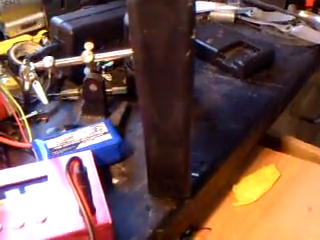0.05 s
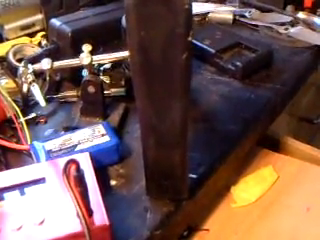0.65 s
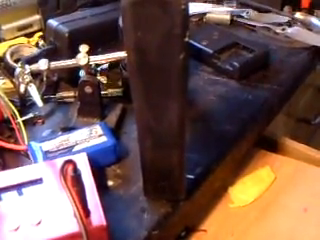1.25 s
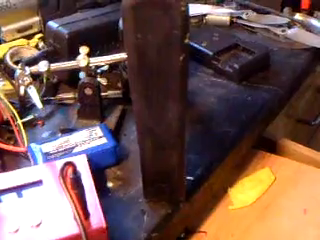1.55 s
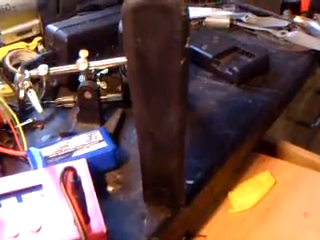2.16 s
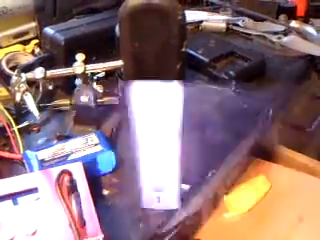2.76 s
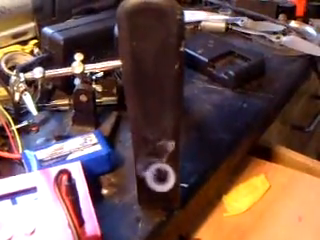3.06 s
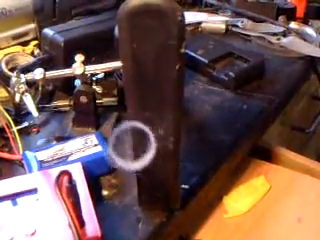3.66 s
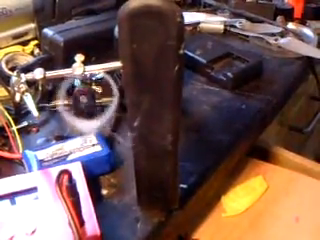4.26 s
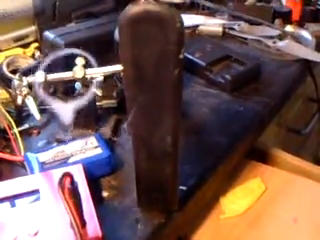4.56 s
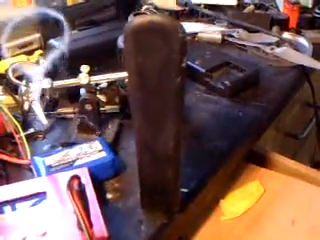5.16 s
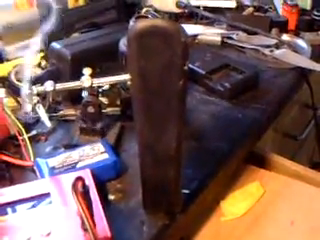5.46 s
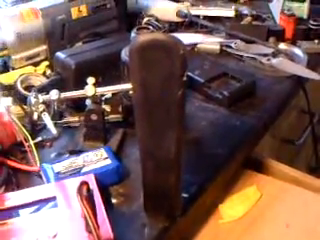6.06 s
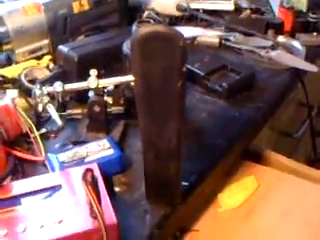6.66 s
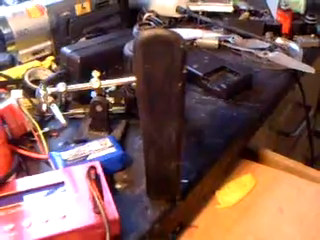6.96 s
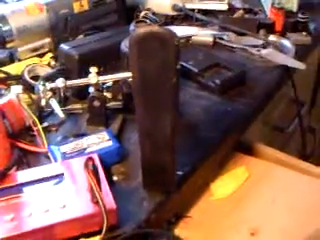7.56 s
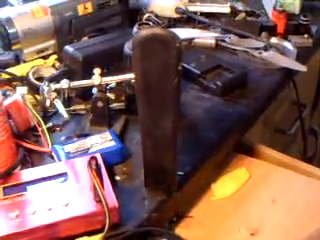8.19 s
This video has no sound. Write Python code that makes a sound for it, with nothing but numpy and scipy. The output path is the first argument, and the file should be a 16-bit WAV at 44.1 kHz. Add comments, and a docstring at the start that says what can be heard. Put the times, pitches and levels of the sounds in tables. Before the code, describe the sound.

A homemade device fires once on a workbench with a sharp crack and pop, over a faint fan whine, followed by camera handling ticks.

```python
"""A small fan whines throughout, over room rumble and microphone hiss. Three seconds in, a homemade
device fires once on a cluttered workbench: a bright ignition crack, then a pop of gas that sets the
bench top and the small room ringing briefly. A dry, switch-like click follows, two faint ticks around
it. The bench takes a soft knock, then fingers tick on the camera's housing. From about six seconds the
hand turns the camera: the fan grows a little louder, and the fingers tick harder and rub the shell."""
import sys
import numpy as np
from scipy import signal
from scipy.fft import rfft, irfft, next_fast_len
from scipy.io import wavfile
from scipy.ndimage import map_coordinates

SR = 44100
rng = np.random.default_rng(int(sys.argv[2]) if len(sys.argv) > 2 else 0)


def dump_mix(stems):
    """Bounce the given channels to the path in sys.argv[1] as a 16-bit WAV at rate SR."""
    frames = np.atleast_2d(stems).T  # one column per channel
    limited = np.clip(frames, -1, 1)  # hard clip at full scale
    pcm = np.round(limited * 32767).astype(np.int16)
    wavfile.write(sys.argv[1], SR, pcm)


N = 367353

# The ring of the bench top and its clutter. Each row: pitch in Hz, relative level in dB, t60 in seconds.
BENCH_MODES = [(140, -7, 0.29), (234.3, 0.5, 0.24), (294, -7, 0.24), (331, 0.5, 0.2), (387, -9, 0.34),
               (532, -11, .15), (610, -14, .16), (693, -3, 0.19), (693, -9, 0.27), (780, -11, .35),
               (895, -2, 0.19), (1140, -10, 0.16), (1230, -1, 0.14), (1324, -8, .18)]


def amp(db):
    """Decibels to gain."""
    return 10 ** (np.asarray(db) / 20)


def unit(x):
    """x at rms 1."""
    return x / np.sqrt(np.mean(x ** 2) + 1e-20)


def along(points, hz):
    """A curve through (Hz, value) points, joined on a log frequency axis."""
    f, v = np.transpose(points)
    return np.interp(np.log(hz + 1), np.log(f + 1), v)


def clock():
    """The time of each sample in seconds."""
    return np.arange(N) / SR


def wobble(rate):
    """A smooth random curve, rate knots a second."""
    return map_coordinates(rng.standard_normal(int(N * rate / SR) + 4), [clock() * rate])


def filtered(x, response):
    """x shaped by a gain that is a function of Hz."""
    size = 2 * next_fast_len((N + SR) // 2)
    return irfft(rfft(x, size) * response(np.fft.rfftfreq(size, 1 / SR)), size)[:N]


def coloured(x, spectrum, size=4096):
    """x through a minimum-phase EQ of (Hz, dB) points, so nothing rings ahead of a hit."""
    cepstrum = irfft(np.log(amp(along(spectrum, np.fft.rfftfreq(size, 1 / SR)))))
    fold = np.r_[1, np.full(size // 2 - 1, 2), np.zeros(size // 2)]
    return signal.fftconvolve(x, irfft(np.exp(rfft(cepstrum * fold))))[:N]


def fade(t, t60):
    """Exponential decay, 60 dB in t60."""
    return np.exp(-np.log(1000) * t / t60)


def at(s, x):
    """A short sound placed at s seconds."""
    return np.pad(x, (round(s * SR), N))[:N]


def impulse(s):
    """One sharp push at s seconds."""
    return at(s, np.ones(1))


def turn(middle_s=6.5, ease_s=.3):
    """How far the camera has turned, easing from 0 to 1."""
    return .5 + .5 * np.tanh((clock() - middle_s) / (2 * ease_s))


def room_air(level_db=-52.0):
    """A steady bed of room rumble and microphone hiss."""
    # The bed's colour. Each row: frequency in Hz, relative level in dB.
    air_eq = [(8.8, -40), (15, -1), (48, -2), (71, -12), (255, -13.5), (293, -14), (319, -14.5),
              (410, -17.5), (755, -18.5), (892, -23.5), (969, -20.5), (1350, -26.5), (11500, -35),
              (15000, -24.5), (22000, -120)]
    return amp(level_db) * unit(filtered(rng.standard_normal(N), lambda hz: amp(along(air_eq, hz))))


def fan(drift_hz=0.79, waver_db=1.7, whirr_hz=2800, width_hz=650, whirr_db=-73.5, swell_db=2.6):
    """Slightly unsteady tones and a band of whirr, swelling as the camera turns."""
    # The fan's tones and the room's hum. Each row: pitch in Hz, rms level in dB before the swell.
    tones = [(43.1, -61.5), (323, -69.5), (943, -65.5), (2829, -81.5), (6858, -94)]
    band = lambda hz: 1 / (1 + (2 * (hz - whirr_hz) / width_hz) ** 2)
    whirr = amp(whirr_db) * unit(filtered(rng.standard_normal(N), band))
    whine = np.zeros(N)
    for hz, db in tones:
        level = np.sqrt(2) * amp(db + waver_db * wobble(5))
        phase = 2 * np.pi * np.cumsum(hz + drift_hz * wobble(6)) / SR
        whine += level * np.sin(phase)
    return amp(swell_db * turn()) * (whirr + whine)


def burst(length_s):
    """A spit of noise that starts at once and collapses after length_s."""
    t = np.arange(SR // 20) / SR
    return rng.standard_normal(len(t)) * np.exp(-(t / length_s) ** 4)


def ringing(modes, attack_s):
    """Struck modes that bloom over attack_s, then die away each at its own rate."""
    t = np.arange(SR // 2) / SR
    ring = sum(amp(db) * fade(t, t60) * np.sin(2 * np.pi * hz * t) for hz, db, t60 in modes)
    return ring * (1 - np.exp(-t / attack_s))


def reverb(x, clutter_db, clutter_t60, room_db):
    """Quick scatter off the bench clutter, then the walls' longer tail."""
    # The small room's decay. Each row: frequency in Hz, t60 in seconds.
    wall_decay = [(120, 0.52), (400, 0.2), (1000, 0.31), (3000, 0.26), (8000, 0.27), (13000, 0.36)]
    hz, frame_s, noise = signal.stft(rng.standard_normal(SR), SR, nperseg=256)
    tail = noise * fade(frame_s, along(wall_decay, hz)[:, None])
    t = np.arange(SR) / SR
    walls = signal.istft(tail, SR, nperseg=256)[1][:SR] * np.clip(t / 0.013, 0, 1)
    clutter = rng.standard_normal(SR) * fade(t, clutter_t60) * (t > .004)
    response = amp(clutter_db) * unit(clutter) + amp(room_db) * unit(walls)
    return signal.fftconvolve(x, response)[:N] / np.sqrt(SR)


def shot(start_s=3.0409, pop_lag_s=0.001104, crack_gain_db=-14.5, pop_gain_db=24.3, send_db=19.0):
    """A crack of ignition, then one push of expanding gas; the device and the bench ring."""
    # The colours of the bright crack and the round pop. Each row: frequency in Hz, gain in dB.
    crack_eq = [(200, -24), (1500, -10), (3000, -4.5), (5000, 3.5), (6000, -7.5), (7100, 4), (8200, -3),
                (10500, -4), (13000, -11)]
    pop_eq = [(40, -43), (120, -19), (250, -2), (450, -0.5), (850, 2.5), (1050, -1.5), (1350, -11.5),
              (1700, -24), (2400, -17.5), (5000, -32), (12000, -41)]
    # Slaps off nearby objects. Each row: delay in seconds, gain in dB.
    reflections = [(.0031, -11.5), (.0064, -37), (.008, -18), (0.0102, -15), (0.018, -27)]
    # The ring of the device's hard parts. Each row: pitch in Hz, relative level in dB, t60 in seconds.
    part_modes = [(1970, 4.5, 0.13), (2370, 3, 0.11), (2870, 4, .11), (3610, 1, .12), (3855, 7, 0.1),
                  (4360, -16, 0.11), (5150, -3, .1), (7100, -1, .11), (7100, 27, .011), (8500, 21, .01)]
    pop_s = start_s + pop_lag_s
    crack = amp(crack_gain_db) * coloured(at(start_s, burst(0.0034)), crack_eq)
    pop = -amp(pop_gain_db) * coloured(impulse(pop_s), pop_eq)
    echoes = sum(amp(db) * at(delay, pop + .5 * crack) for delay, db in reflections)
    bench = amp(-33) * at(pop_s, ringing(BENCH_MODES, attack_s=0.0055))
    parts = amp(-41) * at(start_s, ringing(part_modes, attack_s=.0005))
    # Low sound spreads all round the room; the crack is beamed and stays drier.
    spread_eq = [(70, 1.5), (120, 14.5), (190, -4), (330, 0.5), (450, -5), (1000, -9.5), (2500, 2.5)]
    boom = reverb(coloured(pop, spread_eq), clutter_db=-1.5, clutter_t60=0.12, room_db=-10.5)
    crack_send = amp(crack_gain_db + send_db) * coloured(impulse(pop_s), crack_eq)
    crack_tail = reverb(crack_send, clutter_db=-7.5, clutter_t60=.06, room_db=-12)
    return crack + pop + echoes + bench + parts + boom + crack_tail


def switch(send_db=18):
    """A small hard part snaps back, with no bass, and the room answers."""
    # A faint click, then the snap. Each row: start in seconds, gain in dB, length in seconds.
    snaps = [(3.184, -46, 0.0035), (3.213, -22, 0.0038)]
    # The click's thin colour. Each row: frequency in Hz, gain in dB.
    click_eq = [(150, -20), (600, -5.5), (1050, 0), (1600, -10.5), (2200, 0.5), (3000, -3.5), (4300, -2),
                (5200, -6.5), (8300, -3.5), (10000, -5), (12500, -16)]
    clicks = coloured(sum(amp(db) * at(s, burst(length)) for s, db, length in snaps), click_eq)
    send = coloured(sum(amp(db + send_db) * impulse(s) for s, db, _ in snaps), click_eq)
    return clicks + reverb(send, clutter_db=-3.5, clutter_t60=0.1, room_db=-5.5)


def contact(force, corner_hz=1200):
    """A softer contact spreads the force in time and loses its treble."""
    return signal.lfilter(*signal.butter(2, min(corner_hz, .45 * SR), fs=SR), force)


def housing(force, stiff_hz=480):
    """The camera's shell answers a force with its damped resonances; it is too stiff to pass bass."""
    # The shell's resonances. Each row: centre in Hz, width in Hz, gain in dB.
    shell_modes = [(720, 180, -6), (900, 127, 2.5), (1103, 80, 8.5), (1310, 126, -8), (1740, 220, -9),
                   (2460, 420, -7), (3040, 420, -7.5), (4950, 840, -13.5), (7800, 1200, -15.5),
                   (9000, 610, -6.5), (11100, 1000, -19)]
    force = signal.lfilter(*signal.butter(2, stiff_hz, "high", fs=SR), force)
    return filtered(force, lambda hz: sum(
        amp(db) * 1j * hz * width / (centre ** 2 - hz ** 2 + 1j * hz * width)
        for centre, width, db in shell_modes))


def ticks(gain_db=15, push_lag_s=0.00034, grit_db=-13, grit_s=.0017):
    """Each tick is a gritty click and then a soft push, coloured by the housing's resonances."""
    # Two faint ticks around the switch click, then finger ticks on the housing.
    # Each row: start in seconds, force of the push in dB, force of the click in dB.
    hits = [(3.2035, -48, -32), (3.302, -42, -37.5), (5.181, -40, -36.5), (5.318, -27, -31.5),
            (6.7016, -18, -19), (6.7046, -11.5, -27), (6.7101, -12.5, -22.5), (6.7345, -11, -34),
            (6.7955, -25, -19), (7.155, -11, -22), (7.17, -17, -18), (7.591, -40, -37), (7.854, -22.5, -36),
            (8.23, -36, -36)]
    force = np.zeros(N)
    for s, push_db, click_db in hits:
        grit = amp(grit_db) * burst(grit_s)
        blow = signal.unit_impulse(len(grit))
        corner_hz = 6800 * 2 ** ((click_db + 19.5) / 9.5)  # 9.5 dB harder is an octave brighter
        force += at(s, amp(click_db) * contact(blow + grit, corner_hz))
        force += at(s + push_lag_s, amp(push_db) * contact(blow))
    shell = amp(gain_db) * housing(force)
    return shell + reverb(shell, clutter_db=-15, clutter_t60=0.036, room_db=-19)


def knock(start_s=4.787, gain_db=-43, damping_t60=0.15):
    """A padded touch wakes mainly the bench's low modes and damps them."""
    ring = ringing(BENCH_MODES, attack_s=0.0031)
    damped = ring * fade(np.arange(len(ring)) / SR, damping_t60)
    return coloured(amp(gain_db) * at(start_s, damped), [(350, 3), (700, -10.5)])


def hand_sway(level_db=-52.5):
    """The moving hand's deep thudding fades in with the turn and stays."""
    # The thudding's colour. Each row: frequency in Hz, relative level in dB.
    thud_eq = [(10, -17), (22, 0), (60, -19), (200, -41), (1000, -120)]
    rumble = filtered(rng.standard_normal(N), lambda hz: amp(along(thud_eq, hz)))
    return amp(level_db) * turn() * unit(rumble)


def stroke(peak_s, rise_s, release_share=0.68):
    """A slide gathers speed up to peak_s, then dies in a share of its rise time."""
    t = clock() - peak_s
    return np.exp(np.minimum(t / rise_s, -t / (release_share * rise_s)))


def rub(grain_db=2.5, pressure_waver_db=1.5):
    """Fingers slide with uneven pressure and feed the housing with many tiny slips."""
    # Finger strokes. Each row: fastest moment in seconds, level in dB, rise time in seconds.
    strokes = [(6.84, -54, 0.033), (6.98, -56.5, 0.068), (7.19, -52.5, 0.037), (7.345, -42.5, 0.047),
               (8.0, -55.5, 0.046), (8.2, -55.5, 0.078)]
    friction_eq = [(400, -1), (900, 1.5), (1120, -2.5), (1400, -2),
                   (2200, -8.0), (5000, -5.5), (9300, -11.0), (12000, -14)]
    friction = coloured(rng.standard_normal(N) * amp(grain_db * wobble(300)), friction_eq)
    speed = sum(amp(db) * stroke(s, rise) for s, db, rise in strokes)
    speed *= amp(pressure_waver_db * wobble(40))
    return speed * unit(housing(friction)) + chatter(speed)


def chatter(speed, slips_per_s=210, jitter=.2, gain_db=-3.5, fast_stroke_db=-42.5):
    """A fast finger sticks and slips; the soft slips grow with the square of its speed."""
    rate = slips_per_s * np.exp(jitter * wobble(150))
    count = np.floor(np.cumsum(rate) / SR)
    slips = np.diff(count, prepend=0) * (speed / amp(fast_stroke_db)) ** 2
    return amp(gain_db) * housing(contact(slips))


def scene():
    """Everything at the one microphone."""
    events = shot() + switch() + ticks() + knock() + hand_sway() + rub()
    return (events + room_air() + fan())[None]


def record(dry, ceiling=1.0, knee_hz=11300, top_hz=12855):
    """The camera rounds the highest peaks and rolls off to its band limit."""
    rounded = dry[0] / (1 + (dry[0] / ceiling) ** 6) ** (1 / 6)
    roll_off = lambda hz: amp(-18 * np.clip((hz - knee_hz) / (top_hz - knee_hz), 0, None))
    return filtered(rounded, lambda hz: roll_off(hz) / (1 + (hz / top_hz) ** 120))[None]


dry = scene()
out = record(dry)
dump_mix(out)
```